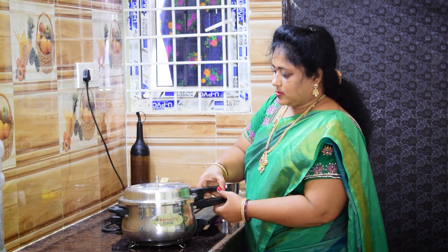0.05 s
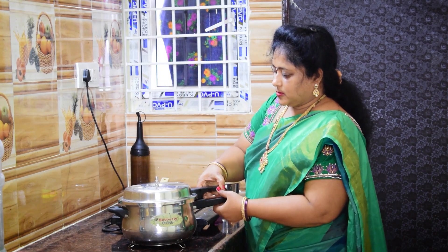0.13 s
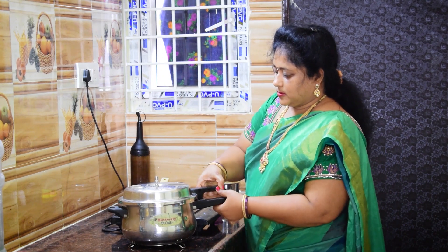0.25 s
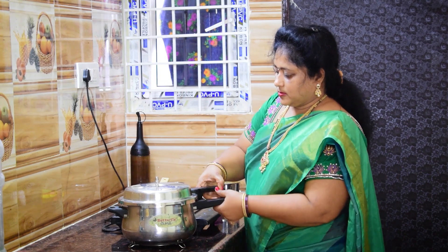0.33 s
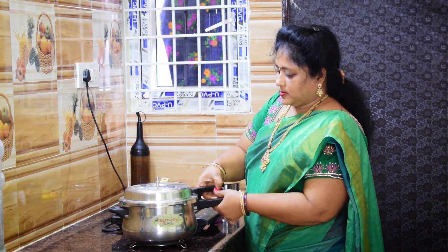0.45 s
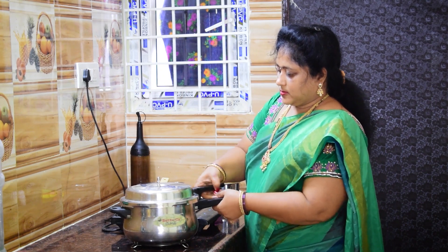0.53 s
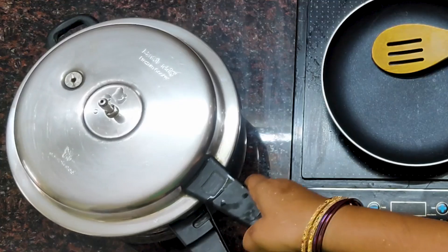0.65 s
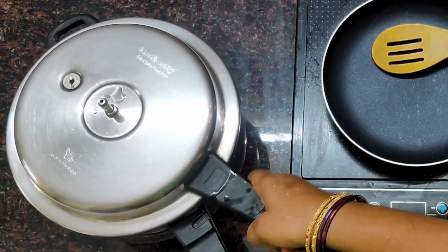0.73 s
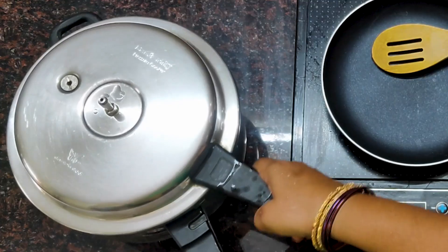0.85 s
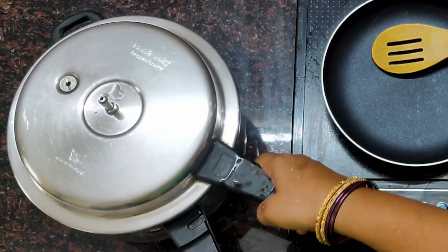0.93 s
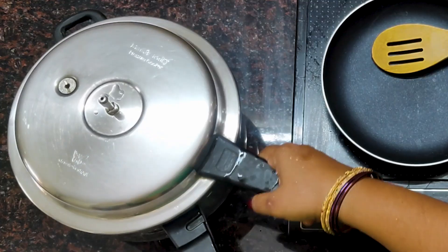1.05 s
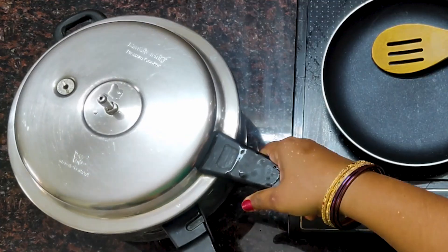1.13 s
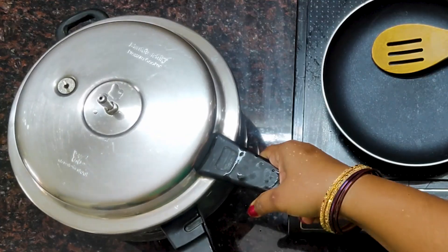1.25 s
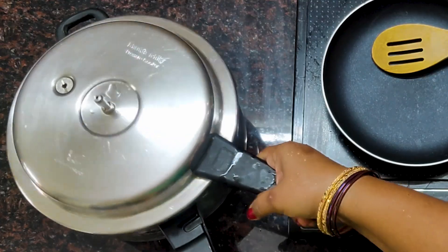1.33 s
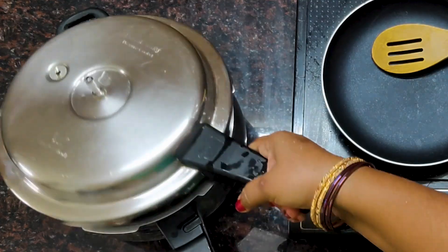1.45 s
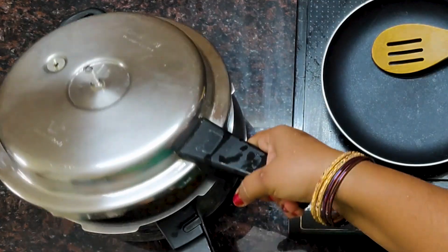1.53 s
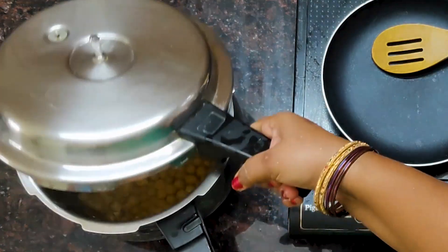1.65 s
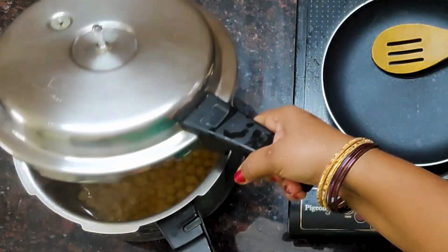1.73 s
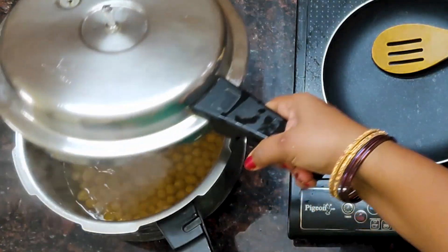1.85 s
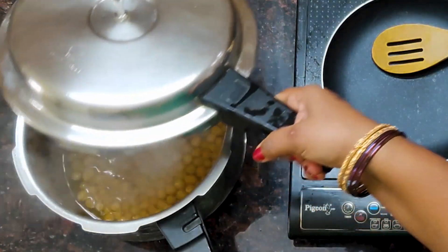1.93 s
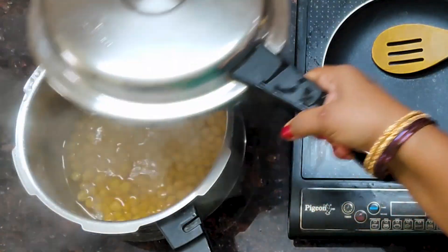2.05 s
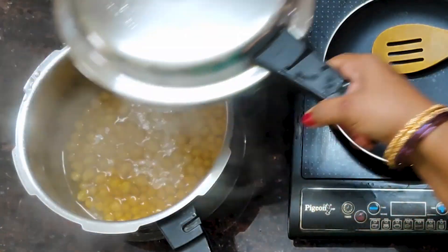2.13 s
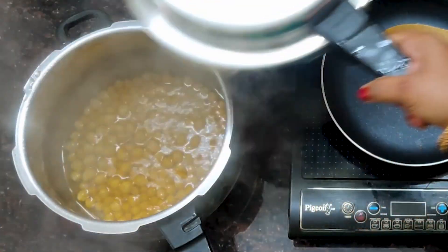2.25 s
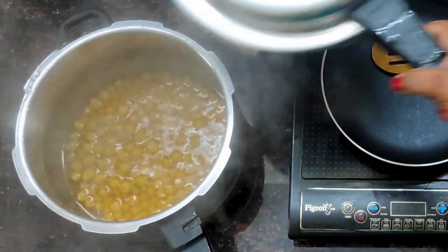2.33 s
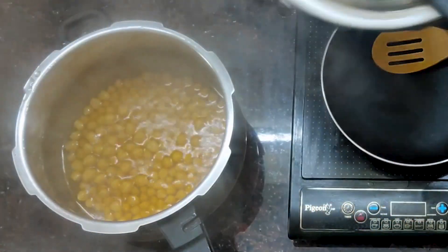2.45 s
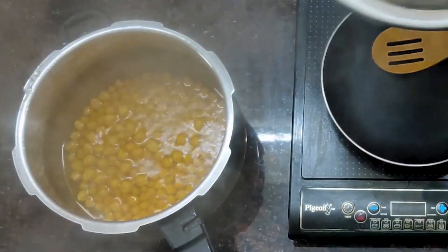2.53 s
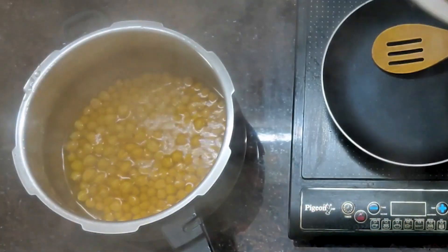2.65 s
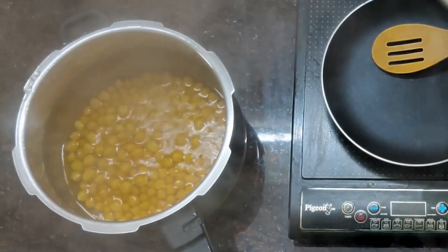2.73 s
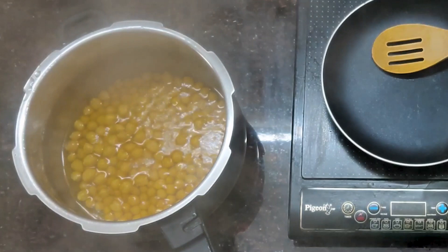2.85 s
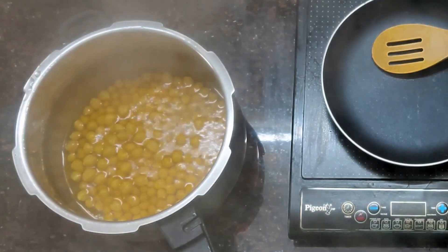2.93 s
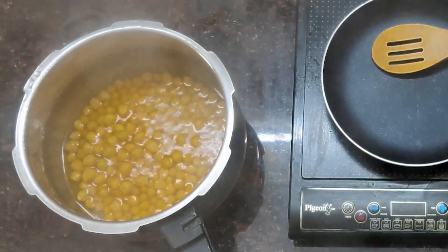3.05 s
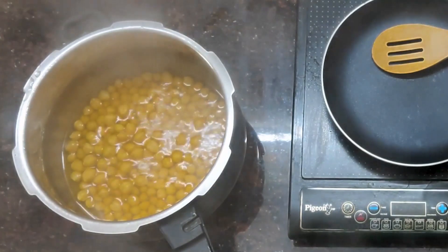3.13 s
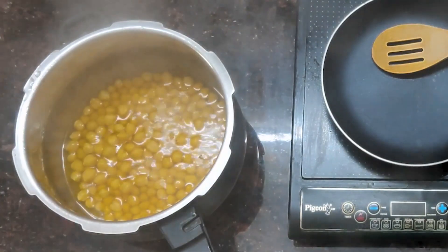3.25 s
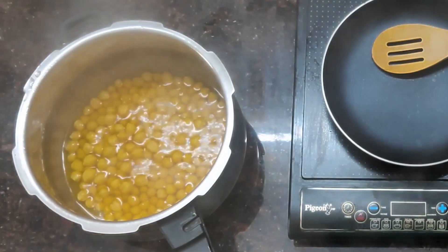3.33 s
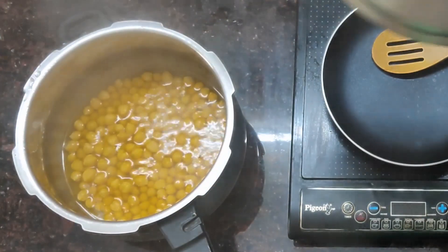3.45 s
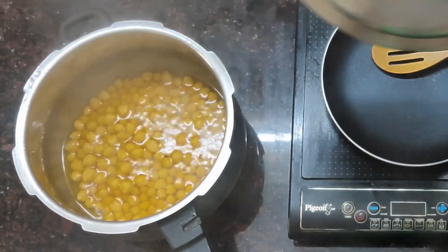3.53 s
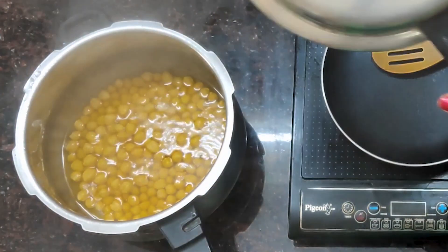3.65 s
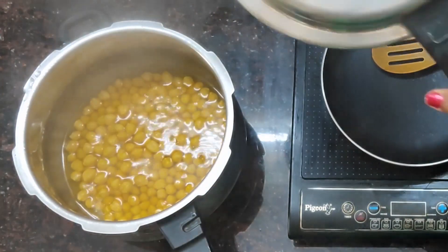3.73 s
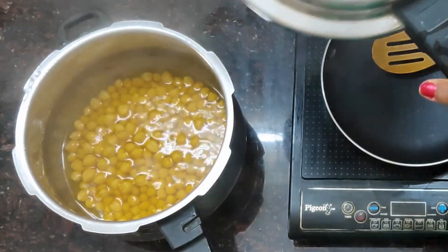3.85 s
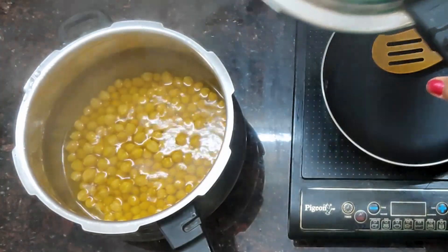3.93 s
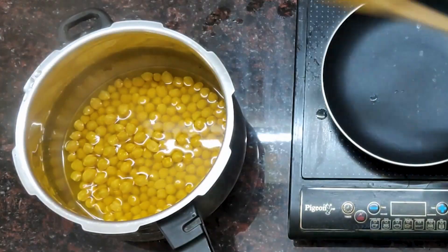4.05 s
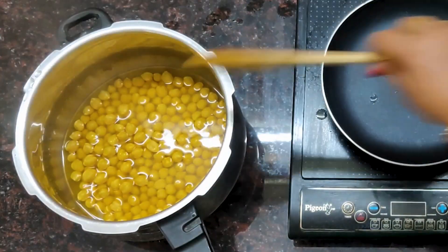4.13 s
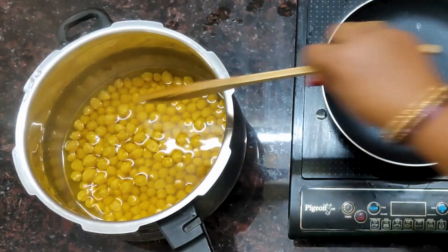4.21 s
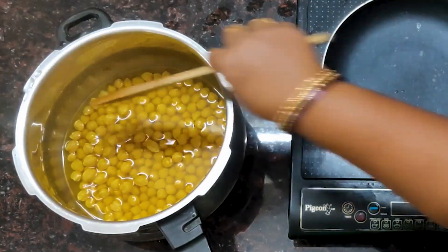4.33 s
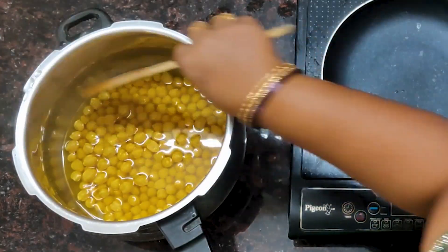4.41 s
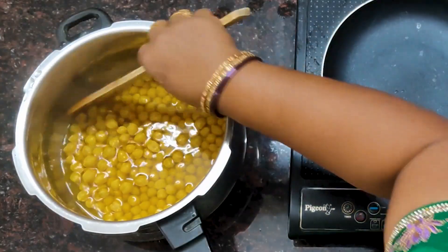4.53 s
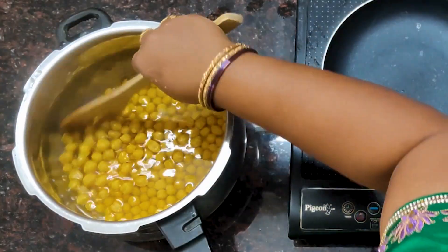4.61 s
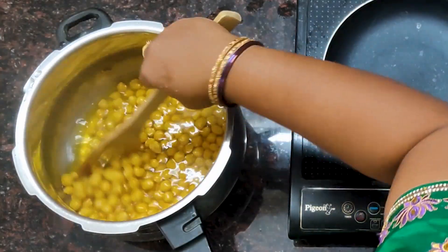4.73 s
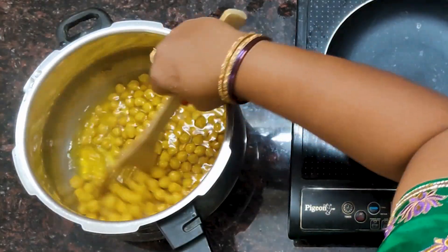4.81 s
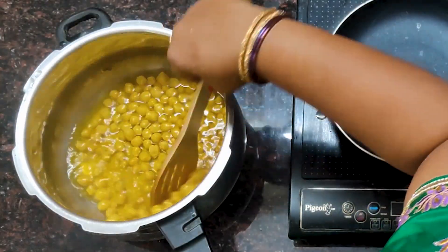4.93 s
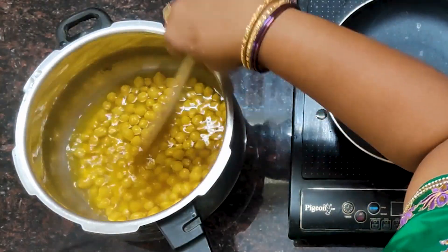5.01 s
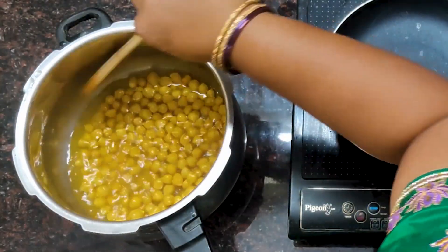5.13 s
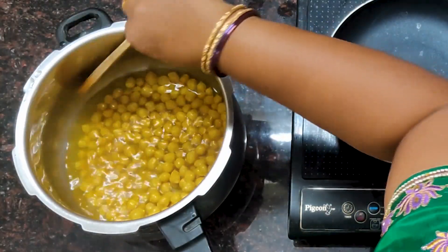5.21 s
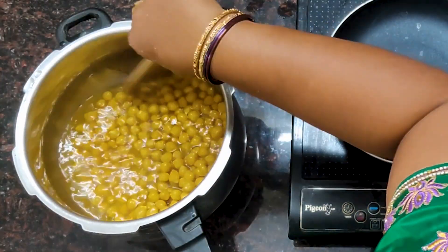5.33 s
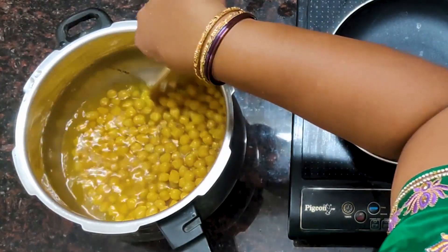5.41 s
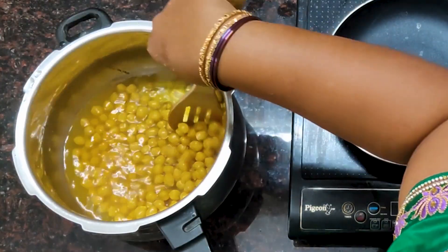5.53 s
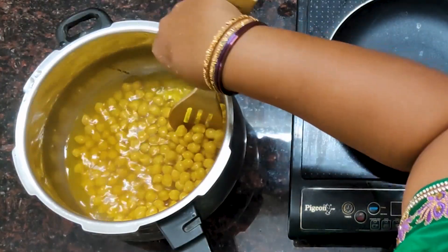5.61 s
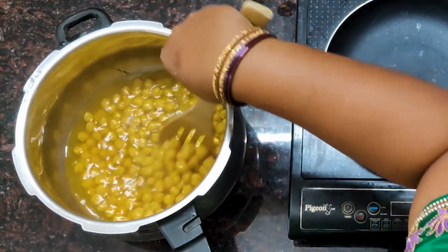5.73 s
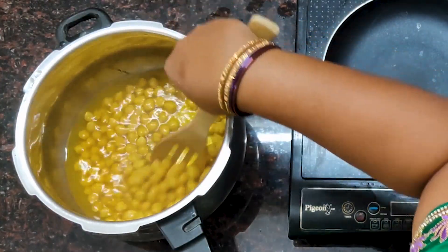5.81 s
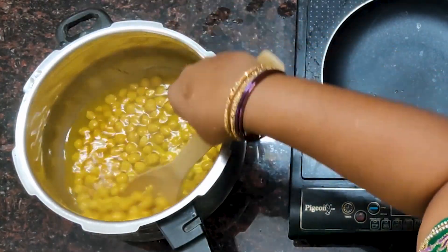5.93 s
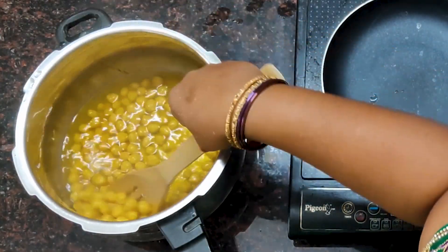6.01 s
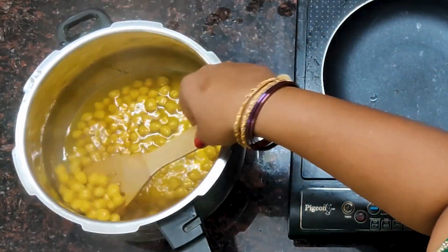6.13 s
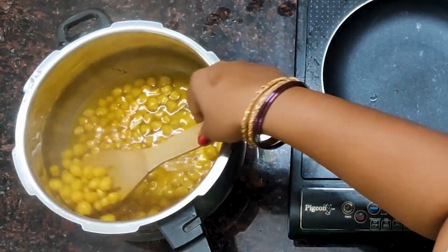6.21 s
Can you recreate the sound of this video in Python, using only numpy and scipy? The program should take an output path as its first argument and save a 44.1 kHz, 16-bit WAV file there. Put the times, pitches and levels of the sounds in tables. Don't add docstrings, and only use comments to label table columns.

```python
import sys
import numpy as np
from scipy import signal
from scipy.fft import rfft, irfft
from scipy.io import wavfile
from scipy.ndimage import uniform_filter1d

SR = 44100
rng = np.random.default_rng(int(sys.argv[2]) if len(sys.argv) > 2 else 0)


def generate_wav(sig):
    pcm = np.round(np.clip(np.atleast_2d(sig).T, -1, 1) * 32767).astype(np.int16)
    wavfile.write(sys.argv[1], SR, pcm)


def decibels_to_gain(level_db):
    exponent = np.asarray(level_db, float) / 20
    return 10 ** exponent


N = 276766


def evened(x):
    return x / np.sqrt(np.mean(x ** 2) + 1e-20)


def read_spectrum(points, freq_hz):
    point_hz, value = np.transpose(points)
    return np.interp(np.log(freq_hz + 1), np.log(point_hz + 1), value)


def add(mix, start_s, sound):
    part = mix[max(round(start_s * SR), 0):][:len(sound)]
    part += sound[:len(part)]


def unroll(rows):
    time_s, *columns = np.transpose(rows)
    t = np.arange(time_s[0], time_s[-1], 1 / SR)
    fade = signal.windows.tukey(len(t), 0.009 * SR / len(t))
    return time_s[0], fade, [np.interp(t, time_s, column) for column in columns]


def coloured(x, tone):
    gain = decibels_to_gain(read_spectrum(tone, np.fft.rfftfreq(len(x), 1 / SR)))
    return irfft(rfft(x) * gain, len(x))


def resonate(x, freq_hz, width_hz):
    turn = np.exp(2j * np.pi * np.cumsum(freq_hz * np.ones(len(x))) / SR)
    r = np.exp(-np.pi * width_hz / SR)
    return 2 * (turn * signal.lfilter([1 - r], [1, -r], x / turn)).real


def strike(blows, ring, tone, clatter_db, clatter_t60_s, contact_ms, split_hz=22.0):
    out = np.zeros(N)
    t = np.arange(SR * 2 // 5) / SR
    freq_hz, level_db, t60_s = np.repeat(np.transpose(ring), 3, axis=1)[:, :, None]
    for start_s, peak_db in blows:
        detune, phase = rng.uniform(-1, 1, (2, len(freq_hz), 1))
        turns = (freq_hz + detune * split_hz * np.sqrt(freq_hz / 4000)) * t + phase
        modes = (decibels_to_gain(level_db - 60 * t / t60_s) * np.sin(2 * np.pi * turns)).sum(0)
        modes = modes / np.linalg.norm(decibels_to_gain(level_db)) / 2
        crowd = evened(coloured(rng.standard_normal(len(t)), tone))
        crowd = crowd * decibels_to_gain(clatter_db - 60 * t / clatter_t60_s)
        onset = 1 - np.exp(-t * 1000 / contact_ms)
        add(out, start_s, decibels_to_gain(peak_db - 3) * (modes + crowd) * onset)
    return out


def rub(rows, steel, body=None, broad_db=-6., grit_db=3.):
    start_s, fade, levels_db = unroll(rows)
    out = 0
    for level_db, peaks in zip(levels_db, (steel, body)):
        unevenness = evened(uniform_filter1d(rng.standard_normal(len(fade)), 150))
        grains = rng.standard_normal(len(fade)) * decibels_to_gain(grit_db * unevenness)
        sung = 0
        for freq_hz, width_hz, peak_db in peaks:
            sung = sung + decibels_to_gain(peak_db) * resonate(resonate(grains, freq_hz, width_hz), freq_hz, width_hz)
        lo, hi = peaks[0][0], peaks[-1][0]
        broad = coloured(grains, [(lo / 3.2, -40), (lo, 0), (hi, 0), (hi * 1.5, -20)])
        out = out + decibels_to_gain(level_db) * evened(evened(sung) + decibels_to_gain(broad_db) * evened(broad))
    return start_s, out * fade


# freq_hz, density_db
AIR_TONE = [(12, -40.5), (20, -3), (129, 0.5), (166, -12.5), (201, 1.5), (266, -25), (491, -15),
            (905, -23.5), (1100, -22.5), (2090, -28.5), (2460, -27.5), (3740, -29), (15500, -36.5)]
# time_s, rumble_db, hiss_db
AIR_LEVELS = [(0, -56.5, -60.5), (0.999, -56, -61), (2, -60, -64.5), (3.301, -58.5, -65.5),
              (3.9, -56.5, -63.5), (4.08, -57.5, -65), (4.09, -61.5, -66.5), (5.1, -60.5, -64.5),
              (5.899, -53.5, -61), (6.28, -54, -61)]
# freq_hz, width_hz, level_db
HUM = [(52, 13, 4), (130, 39, -1.5), (203, 6.9, -2), (484, 30, -15.5)]


def air():
    time_s, rumble_db, hiss_db = np.transpose(AIR_LEVELS)
    t = np.arange(N) / SR
    noise = coloured(rng.standard_normal(N), AIR_TONE)
    white = rng.standard_normal(N)
    hum = sum(decibels_to_gain(db) * resonate(white, freq_hz, width_hz) for freq_hz, width_hz, db in HUM)
    low = coloured(noise, [(260, 0), (330, -40)])
    high = noise - low
    hiss = high / np.std(coloured(noise, [(900, -60), (1000, 0)]))
    rumble = evened(evened(low) + decibels_to_gain(-10.5) * evened(hum))
    rumble = decibels_to_gain(np.interp(t, time_s, rumble_db) + 2.0) * rumble
    return rumble + decibels_to_gain(np.interp(t, time_s, hiss_db) - 1.39) * hiss


# time_s, level_db
WHISTLE = [(0.0, -62), (0.15, -60), (0.28, -69), (0.74, -60.5), (0.91, -67.5), (1.19, -46.5), (1.33, -75.5),
           (1.41, -46.5), (1.84, -79), (2.55, -72), (2.7, -82)]


def whistle():
    start_s, fade, (level_db,) = unroll(WHISTLE)
    steam = resonate(rng.standard_normal(len(level_db)), 2450, 30)
    return start_s, fade * decibels_to_gain(level_db) * evened(steam)


# time_s, steel_db, body_db
TWIST = [
    [(0.0, -57.5, -54), (0.058, -73.5, -62.5), (0.3, -56, -48.5)],
    [(0.3, -58, -51.5), (0.386, -46, -45), (0.52, -70.5, -68)],
    [(0.52, -76, -69.5), (0.712, -90, -62.5), (0.76, -66, -54)],
    [(0.76, -64.5, -44.5), (0.91, -59, -65), (0.92, -53, -48)],
]
# freq_hz, width_hz, level_db
TWIST_STEEL = [(4100, 140, -8), (4730, 87, -4), (6480, 200, -6.5), (8700, 120, -6.5), (10120, 50, 5),
               (10470, 60, 4.5), (11200, 80, -6), (12400, 88, -11.5)]
# freq_hz, width_hz, level_db
POT_BODY = [(449, 150, -4.5), (590, 60, 0), (690, 160, -0.5), (1490, 69, -16.5)]


def twist():
    return rub(sum(TWIST, []), TWIST_STEEL, POT_BODY, broad_db=-9.0, grit_db=2.3)


# start_s, peak_db
NUDGES = [
    (0.232, -35.5),
    (0.774, -28.5),
    (0.789, -31),
]
# freq_hz, level_db, t60_s
NUDGE_RING = [(129, -7, 0.23), (420, -3, .1), (590, 0.5, .09)]
# freq_hz, density_db
NUDGE_TONE = [(59, -26.5), (100, 4), (297, -15.5), (594, 4.5), (923, -52), (2520, -45), (15000, -24)]


def nudges():
    return strike(NUDGES, NUDGE_RING, NUDGE_TONE, -3, .12, 1.6)


# time_s, steel_db, body_db
SLIDE = [
    [(0.92, -38, -48.5), (1.046, -42.5, -61.5), (1.085, -46, -45.5)],
    [(1.085, -36, -32), (1.153, -43.5, -38.5), (1.186, -21.5, -22)],
    [(1.34, -61.5, -54), (1.394, -41.5, -33), (1.4, -25.5, -19.5)],
]
# freq_hz, width_hz, level_db
SLIDE_STEEL = [(4200, 210, -9), (5270, 150, -6.5), (7280, 200, -2), (7850, 150, -3), (8930, 200, -2.5),
               (10460, 210, -0.5), (12900, 380, -8), (14500, 200, -15)]


def slide():
    return rub(sum(SLIDE[:2], []), SLIDE_STEEL, POT_BODY, broad_db=-3.5, grit_db=2.5)


# start_s, peak_db
CATCH = [
    (1.086, -16.5),
]
# freq_hz, level_db, t60_s
CATCH_RING = [(790, -3, .15), (4807, -2.5, .06), (5470, -2, .12), (7290, -5, .06)]
# freq_hz, density_db
CATCH_TONE = [(120, -43.5), (200, -10.5), (288, -17.5), (783, -6), (3230, -25), (5480, -9), (5790, -22.5),
              (15500, -38.5)]


def catch():
    return strike(CATCH, CATCH_RING, CATCH_TONE, -5, 0.14, .6)


# start_s, peak_db
BOOMS = [
    (1.14, -18),
    (1.158, -2.5),
    (1.4, 0),
]
# freq_hz, level_db, t60_s
BOOM_RING = [(80, -8.5, 0.36), (96, -5, 0.43), (129.3, -4, 0.64), (168, -7, .26), (208, -13, .26)]
# freq_hz, density_db
BOOM_TONE = [(30, -29.5), (60, -13.5), (120, 0), (250, -14), (400, -49.5)]


def booms():
    return strike(BOOMS, BOOM_RING, BOOM_TONE, -13, .28, 3.7)


# start_s, peak_db
FREE = [
    (1.164, -8.5),
    (1.187, -2),
    (1.199, -10.5),
]
# freq_hz, level_db, t60_s
FREE_RING = [(474, -1, 0.18), (637, -7, 0.17), (1490, -28.5, 0.4), (4950, -16.5, 0.29), (5390, -8, 0.17),
             (7251, -7, 0.16), (9200, -17.5, 0.13), (10300, -15, 0.22), (11400, -18, 0.17),
             (12100, -8.5, 0.15), (12800, -27, 0.19)]
# freq_hz, density_db
FREE_TONE = [(120, -27.5), (200, 3.5), (293, -23), (585, -4.5), (889, -22.5), (3480, -38.5), (5480, -15.5),
             (5900, -28), (10900, -24.5), (15500, -39)]


def break_free():
    return strike(FREE, FREE_RING, FREE_TONE, -5.5, 0.17, 4.5, split_hz=37.0)


# freq_hz, width_hz, level_db
RUSTLE = [(3800, 900, 0.5), (5350, 1300, 1), (7200, 3100, -0.5), (10500, 3000, -5), (13500, 2000, -6.5)]


def lift_scrape():
    return rub(SLIDE[2], RUSTLE, POT_BODY, broad_db=-2.0, grit_db=3.6)


# start_s, peak_db
CLANK = [
    (1.402, 2),
    (1.417, -0.5),
    (1.439, -3.5),
]
# freq_hz, level_db, t60_s
CLANK_RING = [(357, -4, .12), (404, -4.5, 0.16), (479, -1.5, 0.26), (687, -8, 0.2), (781, -13.5, .35),
              (1485, -24.5, .35), (1947, -22, .24), (3106, -20, 0.17), (3690, -12, 0.36),
              (4000, -16.5, 0.16), (5512, -12, .19), (6630, -11, 0.29), (6900, -7.5, .17),
              (7680, -12.5, 0.22)]
# freq_hz, density_db
CLANK_TONE = [(120, -42.5), (200, -10.5), (445, -12), (488, -13), (534, -19.5), (783, -15), (1110, -38),
              (1480, -33.5), (10200, -20.5), (15500, -36)]


def clank():
    return strike(CLANK, CLANK_RING, CLANK_TONE, -9.5, 0.18, 1.0, split_hz=45.)


# start_s, peak_db
TOUCH = [
    (1.603, -20.5),
]
# freq_hz, level_db, t60_s
TOUCH_RING = [(494, -10, 0.22), (2455, -14, 0.11), (3770, -18.5, 0.13), (4457, -18.5, 0.23),
              (5250, -17, 0.24), (6100, -32, 0.28), (7214, 0.5, 0.11), (8600, -26, 0.21),
              (12000, -17, 0.18)]
# freq_hz, density_db
TOUCH_TONE = [(120, -44), (200, -22), (470, 6), (889, -19.5), (4100, -19), (7470, -13), (15500, -44)]


def touch():
    return strike(TOUCH, TOUCH_RING, TOUCH_TONE, -8.5, 0.16, 0.58)


# start_s, peak_db, freq_hz
TICKS = [(2.4194, -64, 10400), (3.2294, -58.5, 6340), (3.679, -41.5, 4710), (4.3294, -63, 4460),
         (5.4804, -48.5, 7690), (5.5464, -57, 5020), (5.6594, -56, 12900)]


def ticks():
    out = np.zeros(N)
    t = np.arange(3000) / SR
    for start_s, peak_db, freq_hz in TICKS:
        add(out, start_s, decibels_to_gain(peak_db - 60 * t / 0.06) * np.sin(2 * np.pi * freq_hz * t))
    return out


# time_s, level_db
SLEEVE = [(3.5, -78), (3.524, -69), (4.08, -62)]


def sleeve():
    return rub(SLEEVE, RUSTLE, broad_db=2.0, grit_db=1.9)


# time_s, level_db
SET_DOWN = [
    [(3.63, -67), (3.696, -44), (3.82, -69)],
]
# freq_hz, width_hz, level_db
SET_STEEL = [(3380, 180, 1), (4520, 580, 0), (5280, 320, 0), (5720, 430, 0)]


def set_down():
    return rub(SET_DOWN[0], SET_STEEL, broad_db=-0.5, grit_db=2.3)


# start_s, peak_db
BANGLE = [
    (4.0825, -34),
]
# freq_hz, level_db, t60_s
BANGLE_RING = [(3117, -22, 0.32), (4170, -23, 0.27), (4900, -29, 0.56), (6120, -9.5, 0.25),
               (7068, -9.5, 0.038), (11200, -32, 0.49)]
# freq_hz, density_db
BANGLE_TONE = [(1180, -62), (2000, -30), (4100, -13.5), (5630, -23), (6240, -3), (15500, -38)]


def bangle():
    return strike(BANGLE, BANGLE_RING, BANGLE_TONE, -14, 0.24, .3, split_hz=12.5)


# time_s, level_db
APPROACH = [
    [(4.545, -64), (4.567, -53.5), (4.578, -19.5)],
    [(5.24, -79.5), (5.272, -57), (5.279, -28)],
]


def approach():
    out = np.zeros(N)
    for rows in APPROACH:
        add(out, *rub(rows, SET_STEEL, broad_db=-2.5, grit_db=2.9))
    return out


# start_s, peak_db
RIM = [
    (4.578, -7),
    (4.598, -12),
]
# freq_hz, level_db, t60_s
RIM_RING = [(1105, -23, 0.19), (1720, -22, 0.12), (2360, -15, 0.19), (3779, -1, 0.14), (4100, -19, 0.2),
            (4597, -14.5, 0.19), (5100, -18, 0.089), (5570, -21, 0.15), (5750, -1.5, 0.11),
            (6654, -2, 0.12), (6864, -3, 0.12), (7800, -29.5, 0.28)]
# freq_hz, density_db
RIM_TONE = [(150, -78.5), (250, -45.5), (457, -11), (994, -49.5), (1140, -8), (1310, -34.5), (1760, -6.5),
            (2950, -23), (3690, -8), (5580, 1.5), (15500, -41.5)]


def rim():
    return strike(RIM, RIM_RING, RIM_TONE, -6, 0.15, 0.46, split_hz=72.0)


# start_s, peak_db
KNOCKS = [
    (4.762, -33),
    (5.553, -32.5),
    (5.841, -31.5),
    (5.894, -36.5),
]
# freq_hz, level_db, t60_s
KNOCK_RING = [(544, -0.5, 0.25), (640, -35, 0.44), (1143, -3.5, 0.25), (1470, -7, 0.22), (1690, -24.5, 0.1),
              (2070, -15, 0.063)]
# freq_hz, density_db
KNOCK_TONE = [(150, -44.5), (250, -27), (322, -17), (499, 11), (754, 2), (1590, -13), (1740, -12),
              (2210, -32), (6000, -41.5), (7800, -62), (13200, -120)]


def knocks():
    return strike(KNOCKS, KNOCK_RING, KNOCK_TONE, -0.5, 0.27, 1.8)


# start_s, peak_db
WALL = [
    (5.2791, -12),
    (5.299, -21),
    (5.5036, -39),
]
# freq_hz, level_db, t60_s
WALL_RING = [(740, -14, 0.24), (1406, -20.5, .18), (1885, -20, .25), (2345, -23, 0.23), (3030, -26, 0.12),
             (4000, -2, .18), (4368, -14.5, 0.37), (4930, -6, 0.15), (5580, -14, .25), (6220, -12.5, .2),
             (6890, -9, 0.22), (7360, -25.5, .2), (10430, -27, 0.22), (13200, -30, .22)]
# freq_hz, density_db
WALL_TONE = [(150, -59), (250, -21), (1920, -12), (3500, -32), (4160, 4), (5210, -16), (6990, -25),
             (15500, -49)]


def wall():
    return strike(WALL, WALL_RING, WALL_TONE, -12.5, 0.27, 1.0, split_hz=50.)


# time_s, rustle_db, body_db
STIR = [
    [(5.44, -61.5, -63.5), (5.592, -60, -44), (5.7, -60.5, -58.5)],
    [(5.7, -71, -59.5), (5.934, -72.5, -37), (5.96, -70.5, -55)],
    [(5.96, -72.5, -49), (6.232, -59, -55.5), (6.276, -75.5, -62)],
]
# freq_hz, width_hz, level_db
STIR_BODY = [(131, 30, -1), (481, 53, -6.5), (574, 59, 0), (746, 42, 5), (1033, 116, -10), (1188, 116, -16)]


def stir():
    return rub(sum(STIR, []), RUSTLE, STIR_BODY, broad_db=-9.5, grit_db=3.5)


# time_s, pitch_hz, partial_1_db, partial_2_db
SQUEAK = [
    [(5.6, 557.1, -55, -70), (5.652, 549, -25.5, -53), (5.68, 561, -28.5, -33.5)],
    [(5.68, 549, -27.5, -28), (5.698, 550.4, -17.5, -31.5), (5.74, 555.9, -46, -59.5)],
    [(5.74, 558, -39, -55), (5.756, 544, -44.5, -43.5), (5.82, 560, -60, -75)],
]
# multiple, level_db re partial 2
SQUEAK_TOP = [(3, -13), (5, -28)]


def squeak():
    start_s, fade, (pitch_hz, first_db, second_db) = unroll(sum(SQUEAK, []))
    turn = 2 * np.pi * np.cumsum(pitch_hz) / SR
    out = decibels_to_gain(first_db + 3) * np.sin(turn)
    out += decibels_to_gain(second_db + 6) * np.sin(2 * turn + 1.3)
    for multiple, level_db in SQUEAK_TOP:
        out += decibels_to_gain(second_db + level_db) * np.sin(multiple * turn)
    return start_s, fade * out


# freq_hz, t60_s
KITCHEN = [(100, .25), (500, 0.21), (2000, 0.3), (5000, 0.21), (12000, 0.32)]


def kitchen(x):
    taps = np.zeros(SR // 2)
    at = np.arange(200, len(taps) - 20, 12)
    taps[at + rng.integers(0, 12, len(at))] = rng.choice([-1., 1.], len(at))
    freq_hz, t, z = signal.stft(taps, SR, nperseg=256)
    decay = decibels_to_gain(-60 * t / read_spectrum(KITCHEN, freq_hz)[:, None])
    tail = signal.istft(z * decay, SR, nperseg=256)[1]
    return signal.fftconvolve(x, tail / np.linalg.norm(tail))[:N]


def scene():
    near = nudges() + catch() + break_free() + clank() + touch()
    near += ticks() + bangle() + approach() + rim() + knocks() + wall()
    for source in (twist, slide, lift_scrape, sleeve, set_down, stir, squeak):
        add(near, *source())
    far = air() + booms()
    add(far, *whistle())
    return (decibels_to_gain(-0.5) * near + decibels_to_gain(-9.5) * kitchen(near) + far)[None]


def roll_off(x):
    return signal.sosfilt(signal.butter(12, 15610, fs=SR, output="sos"), x)


def record(dry):
    dipped = dry[0] - 0.3 * resonate(dry[0], 3330, 350)
    mix = np.clip(dipped, -1, 1)[None]
    return roll_off(mix)


dry = scene()
out = record(dry)
generate_wav(out)
```